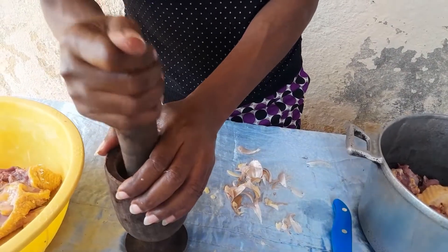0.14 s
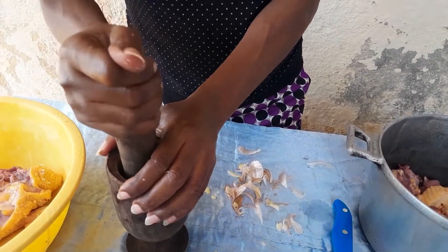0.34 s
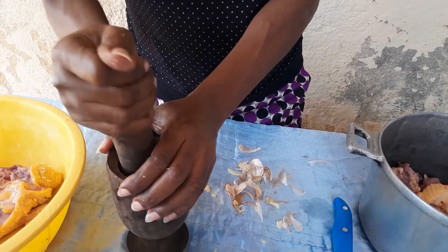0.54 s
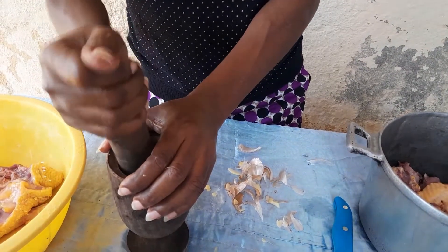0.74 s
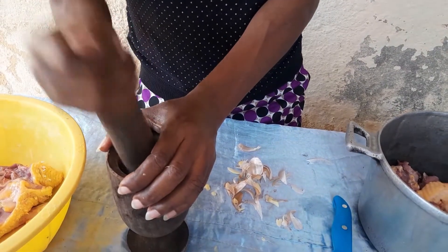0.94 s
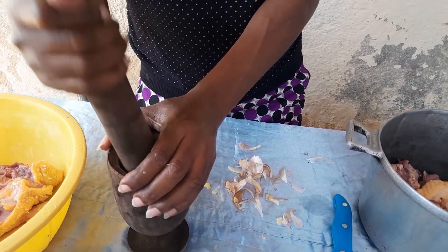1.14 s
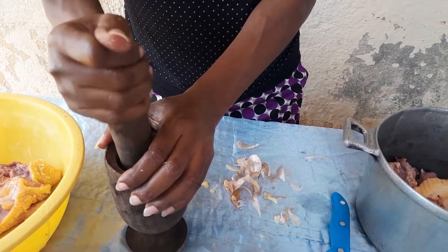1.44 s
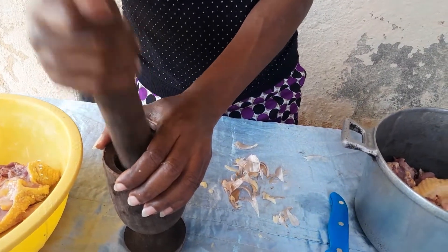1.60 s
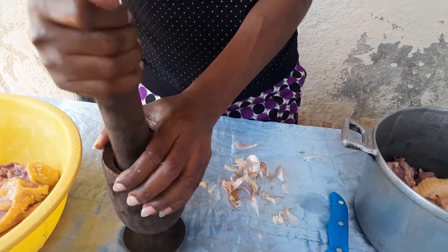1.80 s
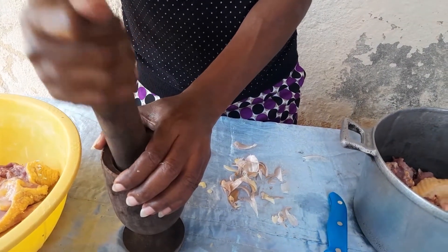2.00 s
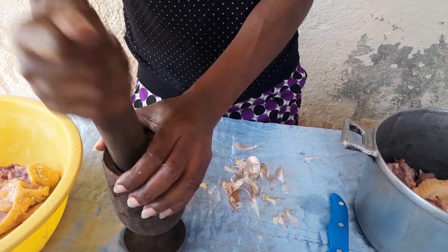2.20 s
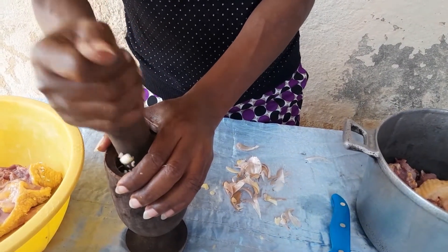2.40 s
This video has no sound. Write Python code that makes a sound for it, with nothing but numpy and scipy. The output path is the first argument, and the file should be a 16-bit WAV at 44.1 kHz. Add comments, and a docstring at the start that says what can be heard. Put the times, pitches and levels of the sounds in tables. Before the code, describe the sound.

Fast, even pestle strokes crush garlic in a wooden mortar on a table, close, in a quiet kitchen

```python
"""Pounding garlic in a mortar

A wooden pestle pounds garlic in a hand-held wooden mortar, about 4.4 strokes a second, in a quiet kitchen.
Shaped noise makes the garlic's crunch; fading sine waves and noise make the table's thump, knocks on
the mortar's wall and the chatter of metal on the table, probably a pot handle. Soft bumps fall between
strokes. A short echo, a hush and a faint wavering tone lie behind. Tables give the time of every event."""
import sys
import numpy as np
from scipy import signal
from scipy.fft import rfft, irfft, next_fast_len
from scipy.io import wavfile
from scipy.ndimage import uniform_filter1d

SR = 44100
rng = np.random.default_rng(int(sys.argv[2]) if len(sys.argv) > 2 else 0)


def transcribe(u):
    """Save the signal u as a 16-bit wav file named by the first command-line argument.

    u: samples, shape (n,) or (channels, n), limited to [-1, 1]; the rate is SR.
    q: integer samples, one column per channel.
    """
    v = np.clip(np.atleast_2d(u).T, -1, 1)
    q = np.round(v * 32767).astype(np.int16)
    wavfile.write(sys.argv[1], SR, q)


N = 112454
T = np.arange(N) / SR  # time of every sample, s

# Levels are relative: each sound also has an overall level in its function.
# Garlic giving way: [peak t/s, level/dB, swell time/s, fizz of juice level/dB, snap of skin level/dB]
CRUNCHES = [(0.148, -3, 0.008, 2.5, -8.5), (0.373, 1, 0.0067, -0.5, -15.5), (0.598, -2.5, 0.0096, 1, -10),
            (.823, 0, .007, -2.5, 0.5), (1.05, 0.5, 0.011, -2.5, -5), (1.282, -1, 0.0095, -1, -5),
            (1.503, 6, 0.0049, -4, -3.5), (1.733, 0.5, 0.0032, -3, -4), (1.953, -2, 0.0046, -1.5, -2),
            (2.175, 0.5, 0.0057, -2, -8), (2.398, 1.5, 0.0051, 0, -5)]
# Faint scraping of garlic skins between strokes: [peak t/s, level/dB]
SCRAPES = [(.24, -3), (.41, -3), (0.629, 1), (.71, -5), (0.768, 0), (.885, 0.5), (.935, -6.5), (1.592, 1)]
# Strokes landing: [t/s, level/dB, table's middle tones level/dB, its upper tones level/dB]
STROKES = [(.143, -10, -6, -12), (0.3602, -16, -6.5, -13), (0.591, -13.5, 4.5, 12),
           (0.8238, -7.5, -1.5, -7), (1.049, -0.5, -3.5, 1), (1.2809, -3.5, -6, 3), (1.5047, -2.5, -4.5, 2),
           (1.734, -1, 1.5, 7.5), (1.9547, -3.5, 5, 5.5), (2.1749, -14, 13.5, 9), (2.395, -19.5, 8, 1)]
# Pushes within one stroke, from garlic, mortar floor and rebound: [delay t/s, level/dB]
PUSHES = [(0, 0), (.008, 2.5), (0.0223, -5)]
# Pestle against the mortar's wall: [t/s, crack level/dB, hollow ring level/dB, bowl's cavity level/dB]
KNOCKS = [(.331, -8.5, 2, -14), (.585, -21, -3.5, -10.5), (0.8094, -12.5, 2.5, 1.5), (1.048, -3, 4, -5.5),
          (1.443, -8, 4, -9.5), (2.3891, 3, -4.5, -8.5)]
# Metal chatter: [t/s, level/dB]
CLINKS = [(1.0581, -2.5), (1.0663, -16), (1.2985, -8.5), (1.5226, -16), (1.74, -2.5), (1.744, -7),
          (1.7698, -16), (1.7722, -15.5), (1.9594, 1), (1.9635, -15), (1.9776, -8), (1.985, -8),
          (2.1733, -17), (2.1866, -10.5), (2.199, -15.5)]
# Soft bumps as the pestle lifts and the mortar shifts: [t/s, level/dB]
BUMPS = [(0, -9), (0.092, -4.5), (0.239, -4.5), (0.526, -14), (0.751, -2.5), (.875, 4.5), (0.939, -2.5),
         (1.189, -4.5), (1.389, 4.5), (1.46, 1), (2.086, -13), (2.261, 2), (2.296, 1), (2.329, 2),
         (2.49, -10)]
# A very faint far tone, points along its path: [t/s, f/Hz, level/dB]
FAR_TONE_PATH = [(.3, 1033, -91), (0.448, 1061, -74), (0.748, 1177, -58), (.95, 1166, -71),
                 (1.349, 1150, -66.5), (1.6, 1187, -59), (1.85, 1178, -59), (2.05, 1110, -66)]

# Tones that each object rings with: [f/Hz, level/dB, time to fade by 60 dB t/s]
TABLE_LOW_TONES = [(55, -42, 0.22), (83.6, -1.5, 0.14), (135, 1.5, 0.17)]
TABLE_MIDDLE_TONES = [(170, -11.5, 0.12), (200, -6, 0.22), (233, -7.5, 0.16), (260, -8, 0.19),
                      (280, -32.5, 0.29)]
TABLE_UPPER_TONES = [(338, -32, 0.033), (428, -15, 0.091), (482, -34.5, 0.3), (602, -22, 0.28),
                     (670, -19, .14), (845, -37, .16)]
WALL_TONES = [(1982, -0.5, 0.017), (2243, -1, 0.021), (2450, -6.5, 0.017), (3560, -23, 0.068),
              (4880, -16.5, 0.044), (7120, -12, 0.016)]
HOLLOW_TONES = [(275, 4, 0.14), (410, -8.5, 0.068), (507.3, -5.5, 0.14), (627, -3.5, 0.16), (774, -4, .13),
                (919, -10, 0.1)]
CAVITY_TONES = [(489.6, 3, 0.13), (843.4, -0.5, 0.12), (1014, -13.5, 0.16)]
METAL_TONES = [(2090, -27.5, 0.1), (2802, -17.5, 0.068), (2900, -20.5, .03), (4370, -11.5, 0.048),
               (4568, -5, 0.051), (4683, -3.5, 0.036), (4993, -7, 0.02), (6260, -22, 0.067),
               (6656, -8, 0.044), (11930, -29.5, .04), (15020, -36, 0.034)]

# Colour of each noise, its strength at each pitch: [f/Hz, level/dB per Hz]
GARLIC_COLOUR = [(300, 3), (900, -2), (1500, -20), (2200, 2), (3000, -7.5), (4500, -3.5), (6000, -6.5),
                 (6900, 1), (7800, -6), (9000, -27.5), (16000, -45)]
FIZZ_COLOUR = [(7000, -33), (9000, -9), (11800, 4.5), (14000, -10.5), (16000, -17)]
SNAP_COLOUR = [(2500, -26), (3150, -9.5), (3480, -2), (3800, -31), (4700, -45)]
THUMP_COLOUR = [(25, -86), (55, -5), (110, -27.5), (200, -15.5), (330, -21), (700, -29), (1200, -45),
                (3000, -53)]
WOOD_COLOUR = [(100, 21), (250, 1), (800, -6), (1100, -2), (1500, -16.5), (2200, -14.5), (3500, -20),
               (5000, -13.5), (9000, -50)]
TICK_COLOUR = [(500, -1), (1400, -7.5), (2300, 7.5), (3600, 3), (4700, 1), (6900, 8.5), (8800, -23),
               (12000, -12), (16000, -37)]
HUSH_COLOUR = [(15, -26), (25, -52), (55, 3), (137, -5.5), (185, -10), (270, -10), (363, -26.5),
               (427, -20.5), (754, -30.5), (863, -22.5), (1370, -32.5), (2110, -26), (3080, -31),
               (6740, -26.5), (8830, -46.5), (11900, -35), (16000, -53)]
# Colour of the kitchen's echo: [f/Hz, level/dB]
ECHO_COLOUR = [(40, 7), (150, -9), (500, 3.5), (2200, -1.5), (5000, -0.5), (8000, -6.5), (16000, -8)]
# The metal's ring at the right (far) ear against the left (near) one: [f/Hz, level/dB]
METAL_SHADE = [(2000, -4), (2800, -23), (4500, -18), (6600, -43), (12000, -29)]

BODY_PAN_DB = -1.84  # left against right, for the table and the mortar's body


def undb(db):
    """Turn decibels into a factor to multiply by."""
    return 10 ** (np.asarray(db) / 20)


def pan(db):
    """Left and right factors that make the left louder by this many dB."""
    return undb(np.array([[db], [-db]]) / 2)


def fade(t60_s):
    """Smooth dying away, by 60 dB in the given time."""
    return np.exp(-np.log(1000) * T / t60_s)


def swell(peak_s, rise_s, fall_s):
    """Loudness curve that grows up to its peak and dies away after it."""
    exponent = np.minimum((T - peak_s) / rise_s, (peak_s - T) / fall_s)
    return np.exp(np.maximum(exponent, -20))


def add(out, start_s, sound):
    """Mix a sound into out from its starting time."""
    i = max(int(start_s * SR), 0)
    out[..., i:] += sound[..., :N - i]


def colour(x, points):
    """Shape the pitch balance of x with a filter that keeps the power of white noise."""
    hz, db = np.array(points).T
    size = next_fast_len(N, True)
    f = np.arange(size // 2 + 1) * SR / size
    gain = undb(np.interp(np.log(f + 1), np.log(hz), db))
    gain /= np.sqrt(np.mean(gain ** 2))
    return irfft(rfft(x, size) * gain, size)[..., :N]


def noise(points, envelope):
    """Coloured stereo noise following a loudness curve, alike in the bass and wider in the treble."""
    mid, side = rng.standard_normal((2, N))
    # the ears differ mostly above 1400 Hz
    side = 1.19 * signal.lfilter(*signal.butter(1, 1400, "high", fs=SR), side)
    return colour(envelope * np.array([mid + side, mid - side]), points)


def ring(tones, scatter=0, opposed=False):
    """Fading sine waves, as from a struck object, each pitch shifted at random by the fraction scatter."""
    t = T[:SR // 2]
    total = np.zeros(len(t))
    for k, (hz, db, t60_s) in enumerate(tones):
        # if opposed, every second tone starts in the opposite direction
        sign = (-1) ** (k * opposed)
        pitch = hz * (1 + scatter * rng.standard_normal())
        decay = np.exp(-np.log(1000) * t / t60_s)
        total += sign * undb(db) * decay * np.sin(2 * np.pi * pitch * t)
    return np.pad(total, (0, N - len(t)))


def soften(x, contact_s):
    """Spread a blow over the time that the two things touch, which dulls it."""
    push = np.sin(np.pi * T[T < contact_s] / contact_s)
    return signal.lfilter(push / push.sum(), 1, x)


def garlic():
    """Grainy crunch that swells as the pestle sinks and soon dies as it bottoms out; skins scrape between."""
    crunch_db, fall_s = -31.5, 0.0036
    scrape_db, scrape_rise_s, scrape_fall_s = -53.5, 0.014, 0.031
    fizz_layer_db, snap_layer_db, pan_db = -11.5, -5, 11.5
    crunch, fizz, snap, scrape = np.zeros((4, N))
    for s, db, rise_s, fizz_db, snap_db in CRUNCHES:
        envelope = undb(crunch_db + db) * swell(s, rise_s, fall_s)
        crunch += envelope
        fizz += undb(fizz_db) * envelope
        snap += undb(snap_db) * envelope
    for s, db in SCRAPES:
        scrape += undb(scrape_db + db) * swell(s, scrape_rise_s, scrape_fall_s)
    # random loudness steps of 32 samples make the grain, with a typical size of 2.5 dB
    steps = np.repeat(rng.standard_normal(N // 32 + 1), 32)[:N]
    grains = undb(2.5 * steps)
    grains /= np.sqrt(np.mean(grains ** 2))
    out = noise(GARLIC_COLOUR, (crunch + scrape) * grains)
    out += undb(fizz_layer_db) * noise(FIZZ_COLOUR, (fizz + scrape) * grains)
    out += undb(snap_layer_db) * noise(SNAP_COLOUR, snap * grains)
    return out * pan(pan_db)


def table():
    """Each stroke pushes the table top through the mortar: a few strong tones over a dull thump."""
    tones_db, contact_s = -15, 0.0018
    thump_db, thump_t60_s = -20.5, 0.16
    tones, envelope = np.zeros((2, N))
    low = ring(TABLE_LOW_TONES)
    for s, db, middle_db, upper_db in STROKES:
        middle = undb(middle_db) * ring(TABLE_MIDDLE_TONES, scatter=0.0069)
        upper = undb(upper_db) * ring(TABLE_UPPER_TONES, scatter=0.0242)
        for delay_s, push_db in PUSHES:
            add(tones, s + delay_s, undb(db + push_db) * (low + middle + upper))
        add(envelope, s, undb(db + middle_db / 2) * fade(thump_t60_s))
    thump = undb(thump_db) * noise(THUMP_COLOUR, envelope)
    return (undb(tones_db) * soften(tones, contact_s) + thump) * pan(BODY_PAN_DB)


def knocks():
    """Wood on wood: a short bright crack that reaches the left ear first, and the hollow of the bowl."""
    wall_db, wall_pan_db, right_lag_s = -13.5, 12, 0.00009
    hollow_layer_db, cavity_layer_db = -33, -27.5
    wood_db, wood_t60_s = -29.5, 0.43
    crack, hollow, envelope = np.zeros((3, N))
    for s, crack_db, hollow_db, cavity_db in KNOCKS:
        add(crack, s, undb(crack_db) * ring(WALL_TONES, 0.006, True))
        add(hollow, s, undb(hollow_layer_db + hollow_db) * ring(HOLLOW_TONES, 0.012, True))
        add(hollow, s, undb(cavity_layer_db + cavity_db) * ring(CAVITY_TONES, 0.0075, True))
        add(envelope, s, undb(hollow_db) * fade(wood_t60_s))
    late_crack = np.interp(T - right_lag_s, T, crack)
    crack = undb(wall_db) * np.array([crack, late_crack]) * pan(wall_pan_db)
    wood = undb(wood_db) * noise(WOOD_COLOUR, envelope)
    return crack + (hollow + wood) * pan(BODY_PAN_DB)


def chatter():
    """Loose metal hops and lands: a tick and a brief ring each time."""
    ring_db, tick_db, tick_t60_s, tick_pan_db = -6, -21.5, 0.018, 7.5
    rings, envelope = np.zeros((2, N))
    for s, db in CLINKS:
        add(rings, s, undb(db) * ring(METAL_TONES, 0.00655, True))
        add(envelope, s, undb(db) * fade(tick_t60_s))
    hz, db = np.array(METAL_SHADE).T
    f = np.arange(N // 2 + 1) * SR / N
    shaded = irfft(rfft(rings) * undb(np.interp(f, hz, db)), N)
    ticks = undb(tick_db) * noise(TICK_COLOUR, envelope) * pan(tick_pan_db)
    return undb(ring_db) * np.array([rings, shaded]) + ticks


def bumps():
    """Low, soft nudges of the table: its low tones, dulled by a longer touch."""
    level_db, contact_s = -23.5, 0.0077
    out = np.zeros(N)
    nudge = soften(ring(TABLE_LOW_TONES), contact_s)
    for s, db in BUMPS:
        add(out, s, undb(db) * nudge)
    return undb(level_db) * out * pan(BODY_PAN_DB)


def kitchen(x):
    """Short blurred echo of the walls, made from fading noise; the treble dies first."""
    level_db, rise_s, split_hz = -14.5, 0.0039, 1800
    low_t60_s, treble_t60_s = 0.31, 0.25
    wash = colour(rng.standard_normal((2, N)), ECHO_COLOUR)
    low = signal.sosfiltfilt(signal.butter(2, split_hz, fs=SR, output="sos"), wash)
    tail = low * fade(low_t60_s) + (wash - low) * fade(treble_t60_s)
    tail *= 1 - np.exp(-T / rise_s)
    tail /= np.sqrt(np.sum(tail ** 2) / 2)
    mono = x.mean(axis=0)[None]
    return undb(level_db) * signal.fftconvolve(mono, tail, axes=1)[:, :N]


def background():
    """The room's hush, noise that slowly gets quieter, and a far tone with a wavering pitch."""
    hush_db, fall_db_per_s, pan_db = -45, 0.95, 3  # the level is that of the middle moment
    s, hz, db = np.array(FAR_TONE_PATH).T
    waver = uniform_filter1d(rng.standard_normal(N), size=900)
    # pitch strays by about 2 percent
    pitch = np.interp(T, s, hz) * (1 + 0.02005 * waver / waver.std())
    tone = undb(np.interp(T, s, db)) * np.sin(2 * np.pi * np.cumsum(pitch) / SR)
    envelope = undb(hush_db - fall_db_per_s * (T - T.mean()))
    return tone + noise(HUSH_COLOUR, envelope) * pan(pan_db)


def scene():
    """The pounding, its echo and the sounds behind it."""
    near = garlic() + table() + knocks() + chatter() + bumps()
    return near + kitchen(near) + background()


def record(dry):
    """The recorder thins the deepest bass, caps the peaks and cuts the top."""
    low_cut_hz, top_hz = 51, 15900
    x = signal.sosfilt(signal.butter(4, low_cut_hz, "high", fs=SR, output="sos"), dry)
    capped = np.clip(x, -1, 1)
    return signal.sosfilt(signal.ellip(8, 0.2, 80, top_hz, fs=SR, output="sos"), capped)


dry = scene()
out = record(dry)
transcribe(out)
```